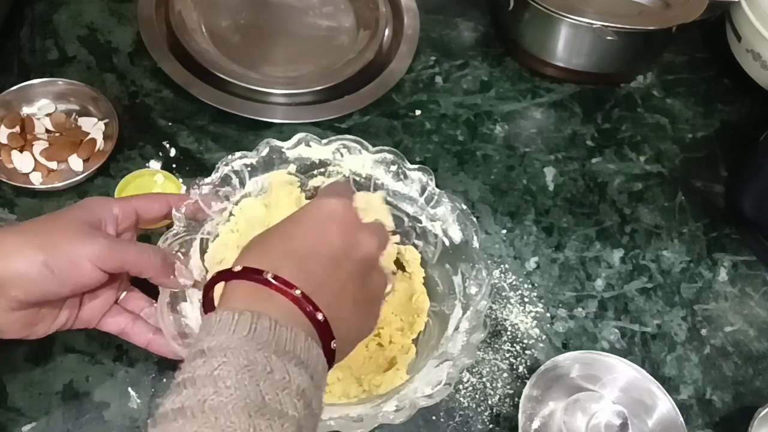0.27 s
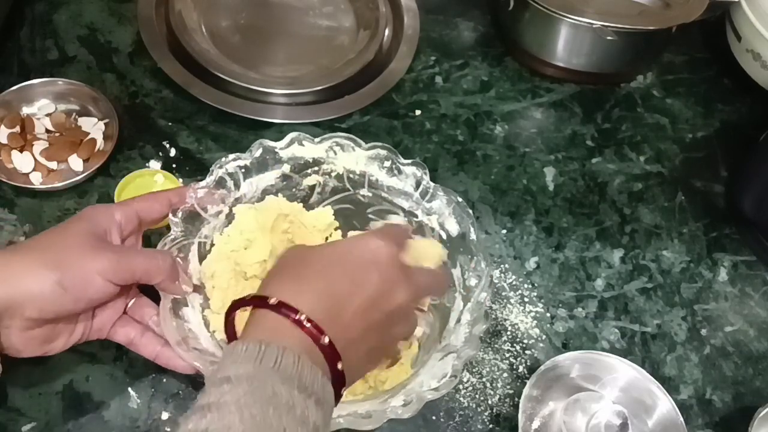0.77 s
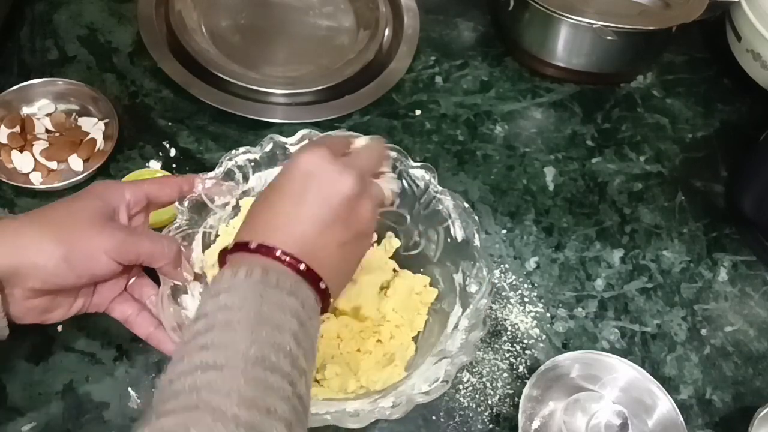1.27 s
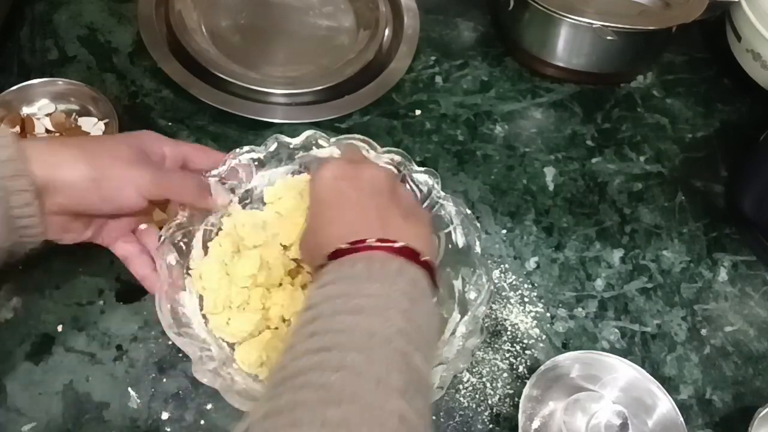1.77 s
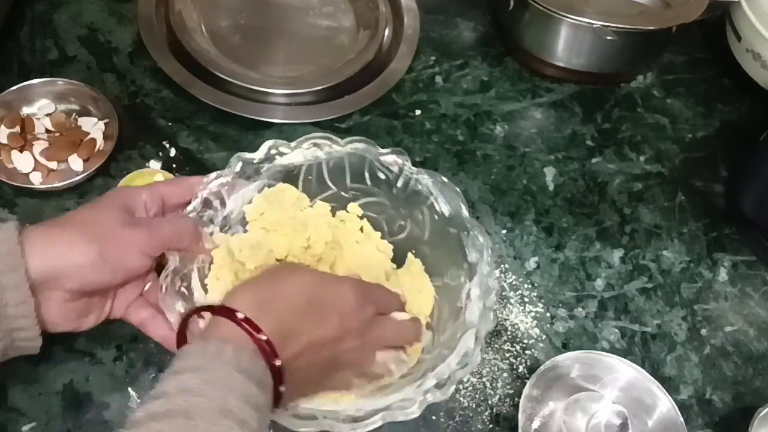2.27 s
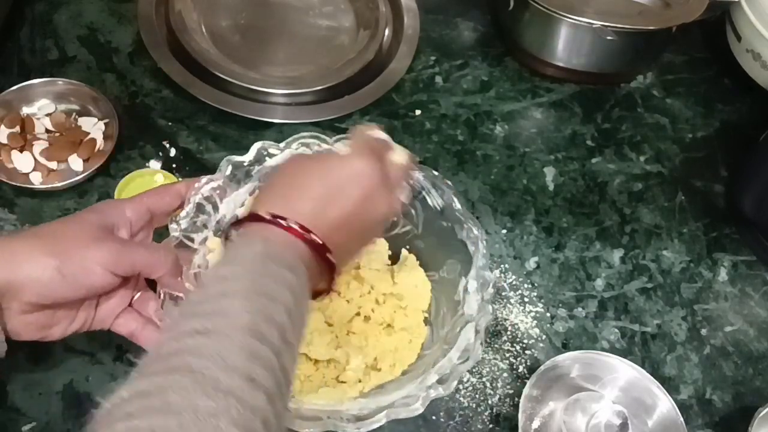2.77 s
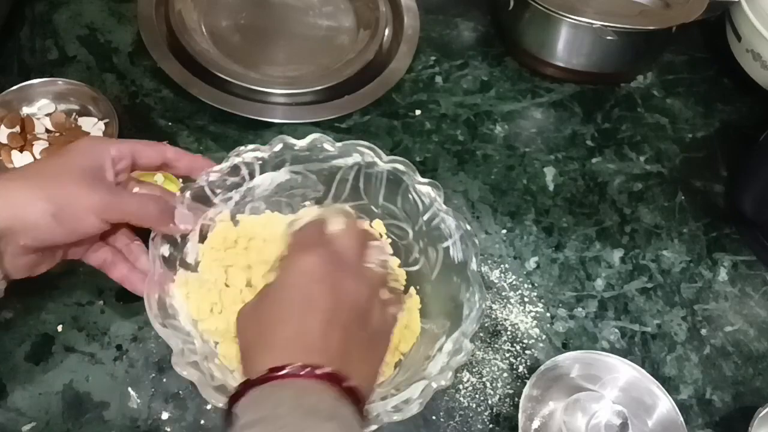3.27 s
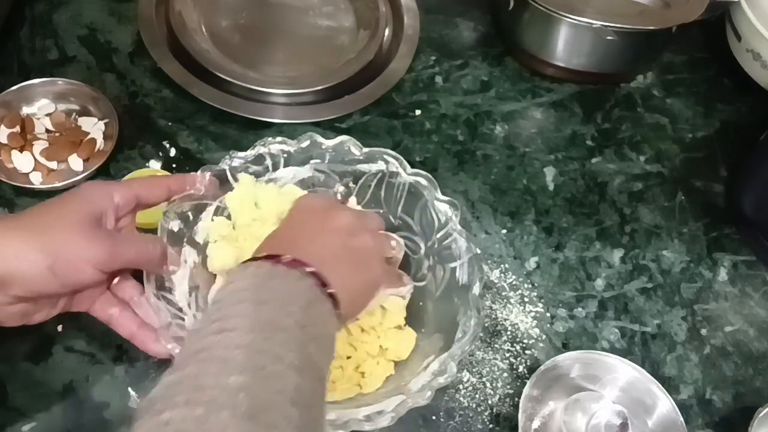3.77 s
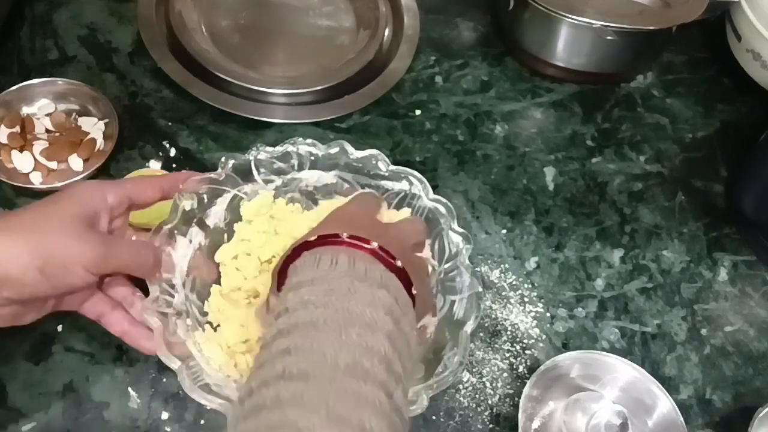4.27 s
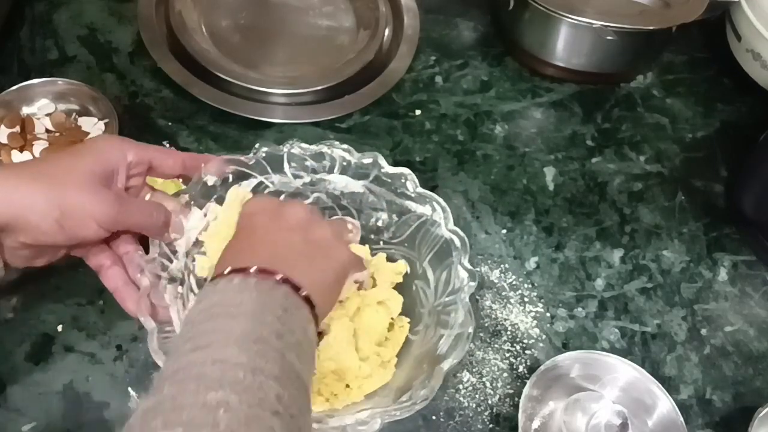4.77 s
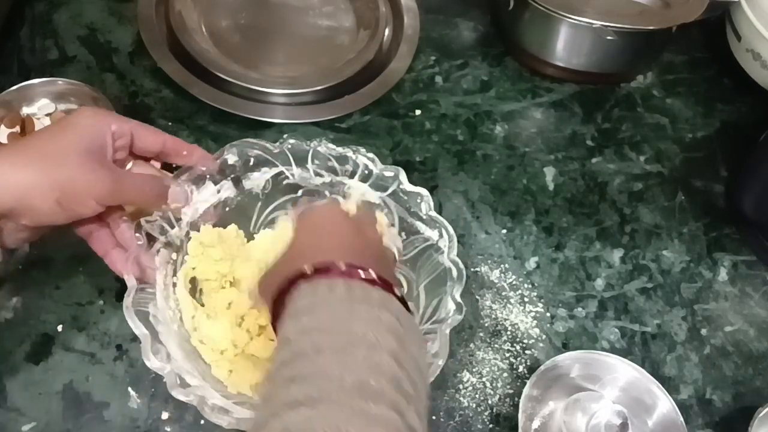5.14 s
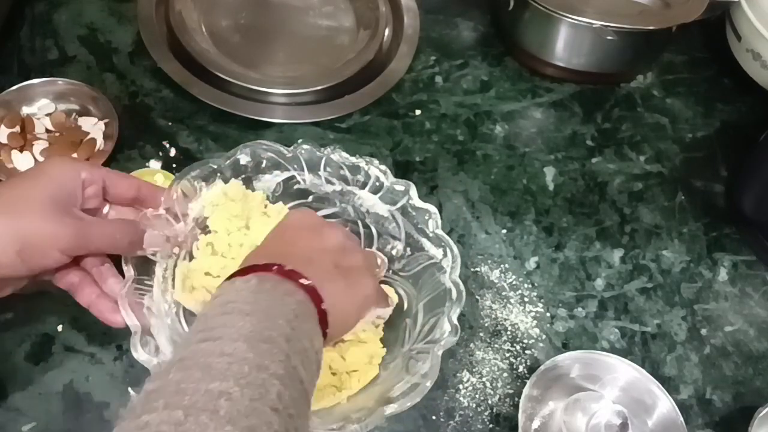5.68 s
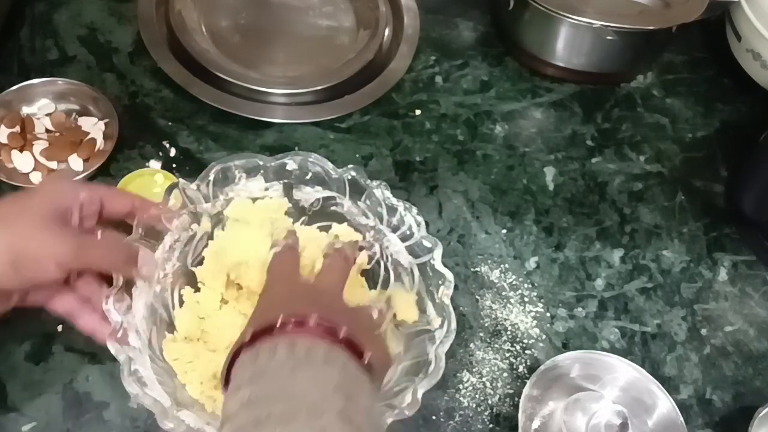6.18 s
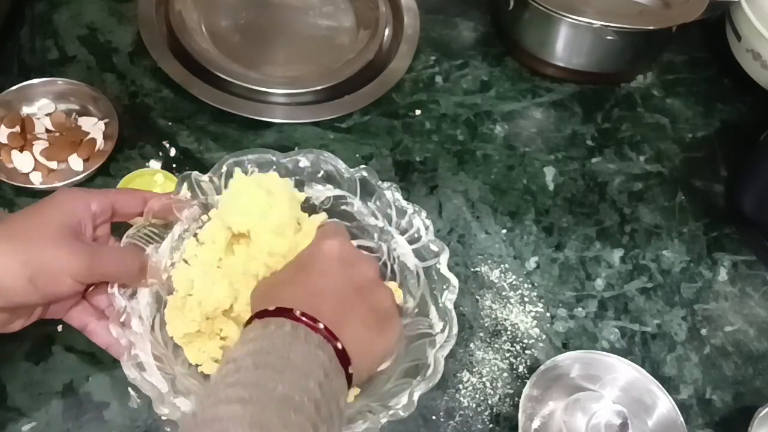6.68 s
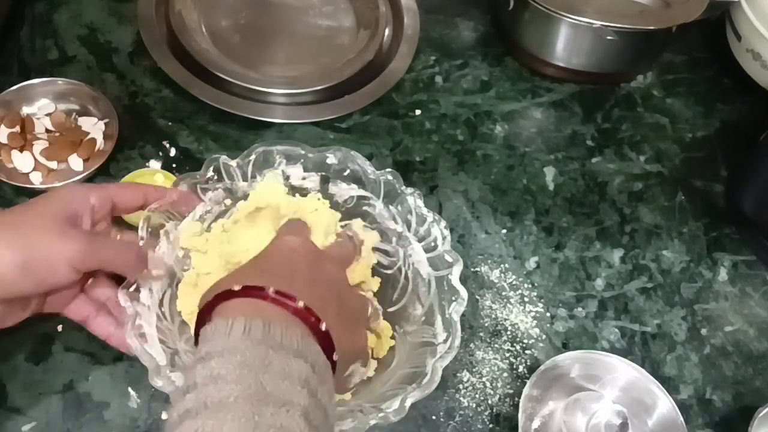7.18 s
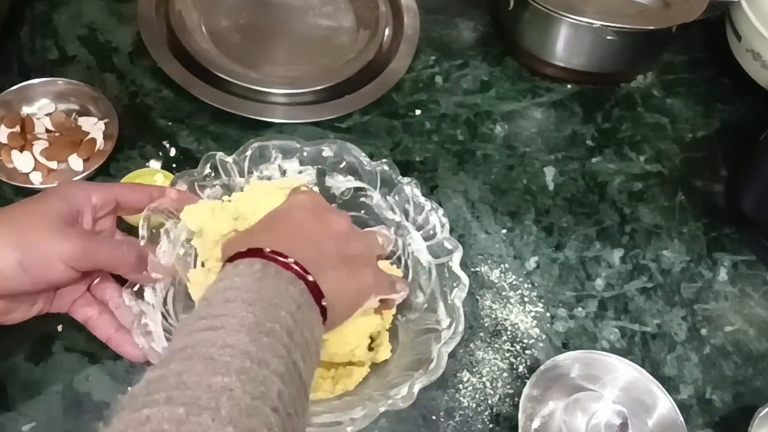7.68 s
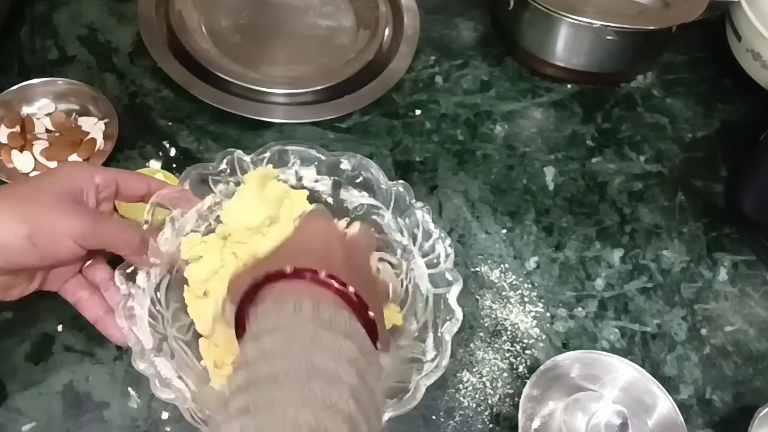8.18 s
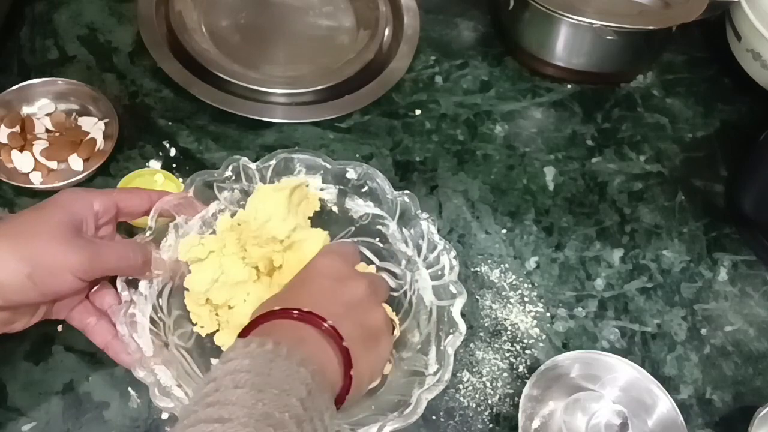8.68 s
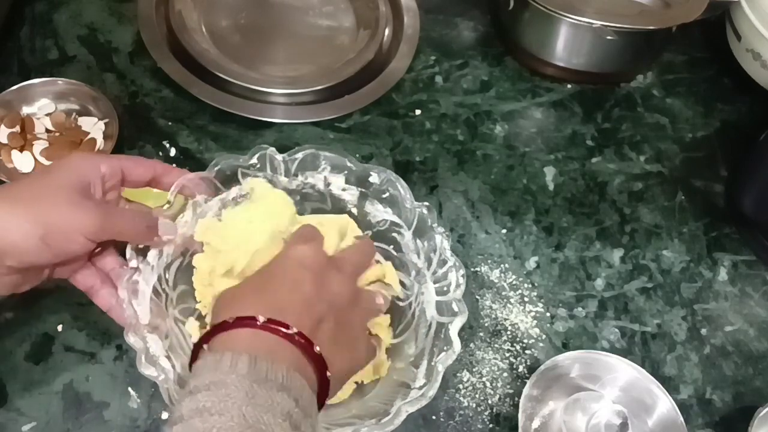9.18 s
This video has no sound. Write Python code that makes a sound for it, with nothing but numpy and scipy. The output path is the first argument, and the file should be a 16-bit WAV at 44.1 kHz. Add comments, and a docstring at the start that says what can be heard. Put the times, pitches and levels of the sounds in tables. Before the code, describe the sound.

Close up in a small hard-walled kitchen, crumbly dough is kneaded in a heavy glass bowl. Soft gritty scrapes and finger rubs alternate with hollow knocks and short grinding of the bowl foot on stone. A bangle clinks and chatters brightly on the rim around two to three seconds, then briefly near six and eight. Knocks stop before the end, leaving faint rubbing and low room hush.

```python
"""A hand kneads crumbly dough in a glass bowl on a stone counter in a small hard-walled kitchen (9.4 s).
From 0.3 s: dough strokes (noise grains), foot knocks and grinding (noise and clicks on counter modes).
1.9-3 s: a bangle clinks and drags on the rim (glass modes), again near 6.1 and 8.3 s; rings slide faintly
at 3.8-7.7 s (resonated friction). Knocks end at 8.7 s, strokes and grinding fade by 9.3 s.
Throughout: echoes, a hush (coloured noise) and a whine (sine); the microphone chain ducks quiet moments."""
import sys
import numpy as np
from scipy import signal
from scipy.fft import rfft, irfft
from scipy.io import wavfile
from scipy.ndimage import uniform_filter1d

SR = 44100
rng = np.random.default_rng(int(sys.argv[2]) if len(sys.argv) > 2 else 0)


def master_out(mix):
    """Clip the mix to full scale and print it as 16-bit PCM to the path in sys.argv[1]."""
    frames = np.transpose(np.atleast_2d(mix))
    ceiling = np.clip(frames, -1, 1)
    pcm = np.round(ceiling * 32767).astype(np.int16)
    wavfile.write(sys.argv[1], SR, pcm)


N = 415422

# All event and mode levels are relative.
# Room hush spectrum: [f/Hz, density/dB]
HUSH = [(15, -42), (25, -12), (76, 9), (309, -5), (575, -7.5), (911, -11), (1070, -12.5), (2840, -20.5),
        (4740, -32.5), (7920, -30.5), (9320, -22.5), (16000, -44.5)]
HUSH_DB, WHINE_HZ, WHINE_DB = -62, 1001, -84
# Kitchen decay: [f/Hz, t60/s]
KITCHEN = [(200, 0.38), (600, 0.46), (1200, 0.43), (2400, 0.4), (5000, 0.44), (12000, 0.34)]
EARLY_DB, EARLY_S = 7, 0.023   # echoes are strong for the first few hundredths of a second, then drop
# Bangles sliding on each other: [middle t/s, half length/s, peak level/dB]
SLIDES = [(3.77, 0.04, -83), (4.764, 0.15, -78.5), (5.68, 0.12, -73.5), (7.724, 0.057, -74.5)]
# Bangle resonances: [f/Hz, width/Hz, level/dB]
BANGLES = [(5270, 33, 0), (6850, 13, -11), (7600, 75, 1.5), (9900, 100, -9.5), (11100, 113, -6.5)]
# Dough strokes: [middle t/s, half length/s, fingers on glass level/dB, crumbs on wall level/dB]
STROKES = [(0.303, 0.15, -98, -62), (0.502, 0.12, -69.5, -58), (0.71, 0.077, -71.5, -74),
           (1.02, 0.11, -67.5, -67), (1.243, 0.12, -72, -80), (1.63, 0.073, -67.5, -63.5),
           (1.88, 0.1, -62, -75), (1.993, 0.057, -48.5, -55), (2.204, 0.035, -74, -57),
           (2.54, 0.12, -73.5, -71.5), (2.96, 0.22, -66.5, -65.5), (3.45, 0.17, -64, -47),
           (3.682, 0.12, -63.5, -60), (3.925, 0.082, -62, -63.5), (4.3, 0.21, -67.5, -59),
           (4.523, 0.15, -71.5, -75.5), (4.807, 0.34, -73.5, -59), (5.157, 0.087, -63.5, -51),
           (5.31, 0.17, -67.5, -53.5), (5.659, 0.2, -60, -53), (5.835, 0.082, -57, -55.5),
           (6.156, 0.069, -60.5, -54), (6.414, 0.18, -66, -54), (6.578, 0.057, -62.5, -64),
           (6.72, 0.23, -64, -64), (6.949, 0.1, -61, -63), (7.431, 0.25, -71, -60),
           (7.71, 0.12, -62.5, -56), (7.92, 0.12, -71, -75), (8.23, 0.064, -59, -57),
           (8.372, 0.078, -62, -56), (8.522, 0.21, -63.5, -54), (8.77, 0.078, -61, -83),
           (9.05, 0.21, -66, -70)]
# Colour of brushing, clatter and ticks: [f/Hz, density/dB]
BRUSH = [(2350, -42), (4000, -11.5), (6780, -13), (8120, -5.5), (9330, 3.5), (12000, -15), (14900, -12.5),
         (16000, -19.5)]
# Dough-damped wall resonances woken by scraping: [f/Hz, level/dB]
SQUEAKS = [(2130, -1), (2400, -4), (2660, -2), (2950, -4), (3250, -9)]
EDGE_DROP_DB = 11   # fade of a rub one half length from its middle
# Bangle clinks on the rim: [t/s, blow level/dB, upper modes level/dB, low mode level/dB, clatter level/dB,
# freedom to ring against the holding hand (t60 factor, floor 0.2), lead of modes marked 1/dB]
CLINKS = [(1.877, -40, -13.5, 9, -35, 0.2, 6), (1.9655, -26, -6, -19.5, -14.5, 0.096, -5.4),
          (2.421, -62, -3, -31, -11, 1.3, -2), (2.4866, -65, -2, -25, -30, 1.3, -0.5),
          (2.5646, -70.5, 0.5, -28, -32, 1.2, -4), (2.74, -65, -3, -31, -22, 1.1, -1.5),
          (2.8839, -18.5, -9.5, -22, -23, 0.71, -3.5), (2.897, -22, -24, -27, -33.5, 1.7, 1),
          (2.9321, -19.5, -35.5, -14, -31.5, 1.4, -1), (2.9647, -13.5, -15.5, -32.5, -27.5, 0.59, -2.5),
          (6.03, -77, -2, -20.5, -15.5, 2.5, 3.2), (6.2291, -19, -8, -14.5, -35.5, 0.9, 5),
          (8.2393, -54.5, -12, -3, -21, 1.37, 8), (8.273, -18.5, -13, -10, -36.5, 0.83, 6.5),
          (8.3234, -36.5, -13.5, 2.5, -25, 1.8, 3.5), (8.4367, -14.5, -12, -16.5, -41, 0.58, 4.5)]
# Bangle drags on the rim: [middle t/s, half length/s, peak level/dB, upper modes level/dB]
DRAGS = [(1.93, .04, -62, -3), (2.475, 0.051, -72.5, -4), (2.736, 0.046, -77, -0.3),
         (2.873, 0.017, -57, -2.2), (2.946, 0.033, -23.5, -6), (2.99, 0.024, -27, -8),
         (3.039, 0.018, -48.5, 2), (6.26, 0.023, -24.5, -28)]
# Glass rim pitches, several split in pairs: [f/Hz]
GLASS_HZ = [1701, 2923, 2962, 4305, 4345, 5728, 5810, 6205, 6740, 7270, 7432, 8445, 9035, 10270, 10790]
# Glass rim modes, one row per pitch: [level/dB, t60 before the freedom factor/s]
GLASS = [(-8, 0.19), (-1.5, 0.12), (-1, 0.1), (-12.5, 0.085), (-18.5, 0.16), (-13, 0.068), (-15.5, 0.055),
         (-16.5, 0.037), (-25.5, 0.18), (-11, 0.095), (-22, 0.044), (-26.5, .08), (-6.5, 0.05),
         (-19.5, 0.076), (-17.5, 0.06)]
# Sign of the lead for each rim mode: [1 raised, -1 lowered, 0 unaffected]
LEAD_SIGN = [0, 1, -1, 1, -1, 1, -1, 1, 0, -1, 1, -1, 0, 0, 0]
RATTLE_DB, RATTLE_T60_S, BLUR_T60_S = -5.5, 0.036, 0.015   # rattle wakes each mode as a blurred band
# Bowl foot on counter: [t/s, blow level/dB, bass/dB, low body/dB, hardness/dB], last three re blow
KNOCKS = [(0.341, -29, -34, 1, -16), (0.382, -26.5, -32, -1.5, -13), (0.553, -63.5, 11, 24, -22),
          (0.643, -24.5, -13, -4.5, -17), (0.882, -28, -10, -7.5, -11.5), (0.999, -48.5, 5, -2, -5),
          (1.322, -58.5, -19, 7, -34), (1.42, -19, -10, -5.5, -7.5), (1.703, -38, -6, 1, -25),
          (1.715, -27.5, -18.5, -4.5, -33), (1.74, -19, -9.5, -5, -1.5), (1.82, -24, -32, 0.5, -43),
          (1.936, -17, -22, 0, -9), (2.025, -11.5, -39, -17, -9.5), (2.094, -18.5, -30, 0.5, -10),
          (2.195, -15.5, -14, -3.5, -18), (2.733, -48, 10.5, 11, -20), (2.886, -26, -17, -9, -4.5),
          (2.931, -17, -30, -9, -8), (3.027, -11, -9.5, -15, -14), (3.303, -11, -14.5, -7.5, -9.5),
          (3.364, -18, -23, -10.5, -19), (3.531, -29.5, 1, -3.5, -23), (3.763, -22, -13, -8, -26),
          (4.146, -52, -5, 10.5, -16.5), (4.287, -43, 9, 2.5, -27), (4.375, -12, -14, -9.5, -16),
          (4.666, -13, -13.5, -11, -7), (5.07, -22, -12.5, -1.5, -33), (5.164, -28.5, -8, -0.5, -28),
          (5.404, -29.5, -1, 1.5, -9), (5.53, -27.5, -3.5, 5.5, -3), (5.839, -45, -27, 4.5, -3),
          (6.136, -35.5, 6, 5.5, -8), (6.181, -25.5, -29, 2.5, -8), (6.23, -19, -14.5, -5.5, -11.5),
          (6.494, -26.5, -3.5, -0.5, -32), (7.248, -12.5, -15, -15, -15), (7.366, -26, -19, -31, -24),
          (7.615, -20, -15, -2, -19.5), (8.137, -29.5, -13.5, 1, -22.5), (8.273, -17, -19, -9, -8),
          (8.435, -24.5, -12, -8, -5), (8.67, -60.5, -6, 14, 0)]
# Foot grinding on stone: [middle t/s, half length/s, peak level/dB]
GRINDS = [(0.5, 0.011, -30), (1.219, 0.027, -54.5), (1.524, 0.095, -36.5), (1.82, 0.14, -32),
          (1.935, 0.01, -25.5), (2.104, 0.048, -39.5), (2.228, .05, -33), (2.59, 0.062, -53),
          (2.811, 0.095, -43.5), (2.98, 0.094, -25), (3.45, 0.16, -37), (3.768, 0.15, -41),
          (4.243, 0.1, -45.5), (4.358, .06, -41.5), (4.822, 0.066, -34), (5.305, 0.33, -53.5),
          (5.46, 0.1, -44.5), (5.69, 0.12, -33), (6.14, 0.059, -33), (6.393, 0.076, -36.5),
          (6.768, 0.12, -50), (7.428, 0.12, -42.5), (7.733, 0.065, -34.5), (8.204, 0.06, -32.5),
          (8.388, 0.02, -31.5), (8.62, 0.12, -49.5), (8.975, 0.24, -55)]
# Counter and loaded bowl modes: [nominal f/Hz, level/dB, t60/s]
COUNTER = [(152.2, 4, .45), (211.5, 1, 0.2), (281.8, -5, 0.32), (339.1, -7.5, 0.51), (380.4, -2.5, 0.23),
           (452.8, -1, 0.18), (543, -8, 0.13), (635.2, -6, 0.31), (724, -5, .06), (792, -3.5, 0.06),
           (900, -12, 0.16), (1089, -15, 0.19), (1268, -17.5, 0.089)]
# Contact force parts: [low f/Hz, high f/Hz, level/dB, t60/s]
CONTACT = [(70, 150, 15, .25), (292.6, 575, 27, 0.033), (518, 1010, 24.5, 0.015), (1290, 2900, 33, 0.049),
           (2050, 2600, 39.5, 0.0016)]
# Broad colour of a knock: [f/Hz, density/dB]
THUD = [(24, -59), (40, -37.5), (101, -5.5), (142, -8.5), (242, -14.5), (277, -3), (381, -4), (588, -11),
        (823, -4.5), (1150, -13.5), (1350, -12), (4500, -64), (5850, -61.5), (9900, -120)]
# Bright ticks of glass edge and hard crumbs: [t/s, level/dB]
TICKS = [(0.374, -48), (0.557, -36.5), (.881, -52), (1.4188, -39.5), (1.7386, -35.5), (1.936, -28),
         (2.1949, -49), (3.3, -32.5), (3.322, -27.5), (3.368, -37), (4.2503, -38), (4.374, -28.5),
         (4.6698, -22.5), (5.0779, -49), (5.3971, -40), (6.489, -38), (7.2517, -25), (7.6132, -39),
         (8.753, -39)]
REBOUNDS, CHATTER_S, REBOUND_DB = 5, .045, -3   # foot rebounds, then the hand pins it
DETUNE_SHARE = .007   # pitch spread with the grip on the bowl
CUTOFF_HZ = 16400


def from_db(db):
    """Decibels to gain."""
    return 10 ** (np.asarray(db) / 20)


def rms_one(x):
    """Scale to unit rms."""
    return x / np.sqrt(np.mean(x ** 2) + 1e-20)


def at_hz(points, hz):
    """Interpolate a table along log frequency."""
    points = np.array(points)
    return np.interp(np.log(hz), np.log(points[:, 0]), points[:, 1])


def coloured(x, spectrum):
    """Filter by a spectrum at minimum phase (no pre-echo), unit energy."""
    size = 8192
    bins_hz = np.arange(1, size // 2 + 2) * SR / size
    cepstrum = irfft(np.log(from_db(at_hz(spectrum, bins_hz))))
    cepstrum[1:size // 2] *= 2   # fold to causal
    cepstrum[size // 2 + 1:] = 0
    response = irfft(np.exp(rfft(cepstrum)))[:size // 2]
    return signal.fftconvolve(x, response / np.linalg.norm(response))[:N]


def band(x, low_hz, high_hz):
    """Gentle band-pass."""
    sos = signal.butter(2, [low_hz, high_hz], "band", fs=SR, output="sos")
    return signal.sosfilt(sos, x + 1e-18)


def ring(clicks, hz, t60_s):
    """Two-pole resonator: a unit click starts a decaying sine of height 1."""
    r = from_db(-60 / (t60_s * SR))
    w = 2 * np.pi * hz / SR
    return signal.lfilter([0, np.sin(w)], [1, -2 * r * np.cos(w), r * r], clicks + 1e-18)


def train(at_s, level_db):
    """One click per event."""
    out = np.zeros(N)
    out[(np.asarray(at_s) * SR).astype(int)] = from_db(level_db)
    return out


def bursts(at_s, level_db, t60_s):
    """Fresh decaying noise per event, unit energy at 0 dB."""
    r = from_db(-60 / (t60_s * SR))
    envelope = signal.lfilter([np.sqrt(1 - r * r)], [1, -r], train(at_s, level_db) + 1e-18)
    return envelope * rng.standard_normal(N)


def grains(per_s, spread_db):
    """Random clicks of uneven size and sign, unit rms."""
    sizes = from_db(spread_db * np.minimum(rng.exponential(1, N), 5))
    signed = sizes * rng.choice([-1, 1], N)
    return rms_one(signed * (rng.random(N) < per_s / SR))


def swells_db(middle_s, half_s, peak_db):
    """Level of rubs that swell and fade smoothly; overlaps add in power."""
    t_s = np.arange(0, N + 64, 64) / SR
    away = (t_s[:, None] - middle_s) / np.maximum(half_s, .005)
    power = from_db(2 * (peak_db - EDGE_DROP_DB * away ** 2)).sum(axis=1)
    return np.interp(np.arange(N) / SR, t_s, 10 * np.log10(power + 1e-15))


def hush():
    """Room background: coloured noise plus a faint steady sine."""
    noise = from_db(HUSH_DB) * coloured(rng.standard_normal(N), HUSH)
    return noise + from_db(WHINE_DB) * np.sin(2 * np.pi * WHINE_HZ * np.arange(N) / SR)


def kitchen(x):
    """Dense echoes decaying per half-octave band; they start at 180 Hz, the deep bass stays dry."""
    t_s, patterns = np.arange(SR * 3 // 4) / SR, 3
    edges_hz = np.geomspace(180, 17000, 14)
    tails = 0
    for low_hz, high_hz in zip(edges_hz, edges_hz[1:]):
        noise = band(rng.standard_normal((patterns, len(t_s))), low_hz, high_hz)
        tails = tails + noise * from_db(-60 * t_s / at_hz(KITCHEN, low_hz))
    tails *= np.clip(t_s / 0.003, 0, 1)   # echo build-up
    tails *= from_db(EARLY_DB * np.exp(-(t_s / EARLY_S) ** 2))
    # knocks take turns among three random echo patterns
    pattern = np.searchsorted(np.array(KNOCKS)[:, 0] - .002, np.arange(N) / SR) % patterns
    out = 0
    for k, tail in enumerate(tails):
        out = out + signal.oaconvolve(x * (pattern == k), tail / np.linalg.norm(tail))[:N]
    return out


def bangles():
    """Friction grains excite narrow resonances of the rings."""
    friction = from_db(swells_db(*np.transpose(SLIDES))) * grains(1800, spread_db=6.5)
    out = 0
    for hz, width_hz, level_db in BANGLES:
        t60_s = np.log(1000) / np.pi / width_hz
        out = out + from_db(level_db - 11.5) * ring(friction, hz, t60_s)
    return out


def fingers(brush_db):
    """Fingers brush the glass: dense coloured grains."""
    return from_db(brush_db) * coloured(grains(7700, spread_db=2.5), BRUSH)


def crumbs(scrape_db):
    """Grit dragged along the wall: broad rasp plus short squeaky rings slipping independently."""
    out = rms_one(band(band(grains(1200, spread_db=2.5), 1200, 3200), 1100, 3400))
    for hz, level_db in SQUEAKS:
        squeak = ring(grains(500, spread_db=2.5), hz, t60_s=.11)
        out += from_db(level_db - 3.5) * rms_one(squeak)
    return from_db(scrape_db - 5.5) * out


def rim():
    """Clinks strike each glass mode with its own strength amid a clatter; drags keep modes singing."""
    s, blow_db, upper_db, low_db, clatter_db, freedom, lead_db = np.transpose(CLINKS)
    out = band(band(bursts(s, blow_db + upper_db + 1, t60_s=.04), 3500, 11000), 2000, 11000)
    out += band(bursts(s, blow_db - 7, t60_s=.03), 600, 3500)
    out += coloured(bursts(s, blow_db + clatter_db + 36, t60_s=0.062), BRUSH)

    middle_s, half_s, drag_db, drag_upper_db = np.transpose(DRAGS)
    slips = grains(500, spread_db=3)
    drag = from_db(swells_db(middle_s, half_s, drag_db)) * slips
    drag_upper = from_db(swells_db(middle_s, half_s, drag_db + drag_upper_db)) * slips
    lead = from_db(np.interp(np.arange(N) / SR, s, lead_db))   # interpolated between clinks

    t_s = np.arange(SR // 2) / SR
    contact = np.clip(t_s / 0.001, 0, 1)   # the blow takes a moment
    strengths_db = rng.normal(0, 1.7, (len(s), len(GLASS)))
    for k, (hz, sign, (level_db, t60_s)) in enumerate(zip(GLASS_HZ, LEAD_SIGN, GLASS)):
        register_db = upper_db + 9 if hz > 3600 else low_db + 14 if hz < 2300 else 0
        mode_db = blow_db + level_db + sign * lead_db + register_db
        sine = contact * np.sin(2 * np.pi * hz * t_s)
        for e, at in enumerate((s * SR).astype(int)):
            decay_db = 60 * t_s / t60_s / max(freedom[e], .2)
            out[at:at + len(t_s)] += from_db(mode_db[e] + strengths_db[e, k] - decay_db) * sine
        out += ring(bursts(s, mode_db + RATTLE_DB, RATTLE_T60_S), hz, BLUR_T60_S)
        if hz > 2300:
            rub = drag_upper if hz > 3600 else drag
            out += ring(rub * lead ** sign * from_db(-26 + 0.89 * level_db), hz, t60_s)
    return out


def counter(grind_db):
    """Knocks and grinding share the counter modes and the broad thud colour."""
    s, blow_db, bass_db, body_db, hard_db = np.transpose(KNOCKS)
    force = from_db(grind_db - 8.5) * grains(2500, spread_db=4.5)
    shares_db = [bass_db, body_db, 0, hard_db, hard_db]
    for (low_hz, high_hz, gain_db, t60_s), share_db in zip(CONTACT, shares_db):
        landing = bursts(s, blow_db + share_db + gain_db, t60_s)   # foot chatters as it lands
        force += band(landing, low_hz, high_hz)

    slots = np.arange(1, REBOUNDS + 1) - rng.uniform(0, .7, (len(s), REBOUNDS))
    later_s = slots / REBOUNDS * CHATTER_S
    later_db = blow_db[:, None] + REBOUND_DB + rng.normal(0, 1.6, later_s.shape)
    rebounds = -train((s[:, None] + later_s).ravel(), later_db.ravel())

    rings, grips = 0, 2   # knocks alternate between two grips
    strengths_db = rng.normal(0, 3, (len(s), len(COUNTER)))
    for k, (hz, level_db, t60_s) in enumerate(COUNTER):
        share_db = bass_db if hz < 250 else body_db if hz < 600 else 0
        struck_db = blow_db + share_db + level_db + strengths_db[:, k] - 9.5
        grind = from_db(grind_db + level_db - 46.5) * rng.standard_normal(N)
        rings = rings + ring(grind, hz, t60_s)
        shifts = rng.normal(0, DETUNE_SHARE, grips) * (hz > 250)
        for grip, shift in enumerate(shifts):
            clicks = train(s[grip::grips], struck_db[grip::grips])
            rings = rings + ring(clicks, hz * (1 + shift), t60_s)

    ticks = bursts(*np.transpose(TICKS), t60_s=0.031)
    ticks = from_db(-3.5) * coloured(ticks, BRUSH) + from_db(-2.5) * band(ticks, 4000, 15000)
    # blunt contact: soft starts
    blunt = band(band(rings, 46, 1900) + from_db(25) * band(rebounds, 280, 1047), 45, 2000)
    return band(coloured(force, THUD) + blunt, 95, 9000) + ticks


def scene():
    """Sum hush, echoes, bangles, dough, rim and counter."""
    middle_s, half_s, brush_db, scrape_db = np.transpose(STROKES)
    low = counter(swells_db(*np.transpose(GRINDS)))
    high = rim()
    room = kitchen(from_db(2.5) * low + from_db(-4.5) * high)
    dough = fingers(swells_db(middle_s, half_s, brush_db)) + crumbs(swells_db(middle_s, half_s, scrape_db))
    return (hush() + room + bangles() + dough + high + low)[None]


def held_db(x, release_db_per_s):
    """Peak level released at a steady rate."""
    fall_db = release_db_per_s * np.arange(N) / SR
    return np.maximum.accumulate(20 * np.log10(np.abs(x) + 1e-9) + fall_db) - fall_db


def record(dry):
    """Microphone cuts deep bass and rounds peaks, a suppressor ducks quiet moments; the top is cut."""
    top = .8
    quiet_db, duck_db_per_db, duck_most_db = -48, .6, 8
    heard = signal.sosfilt(signal.butter(2, 60, "high", fs=SR, output="sos"), dry)
    below_db = quiet_db - held_db(heard[0], release_db_per_s=295)
    duck_db = np.clip(duck_db_per_db * below_db, 0, duck_most_db)
    ducked = heard * from_db(-uniform_filter1d(duck_db, size=89))   # smoothed over 2 ms
    rounded = top * np.tanh(ducked / top)
    return signal.sosfilt(signal.cheby2(12, 70, CUTOFF_HZ, fs=SR, output="sos"), rounded)


dry = scene()
out = record(dry)
master_out(out)
```